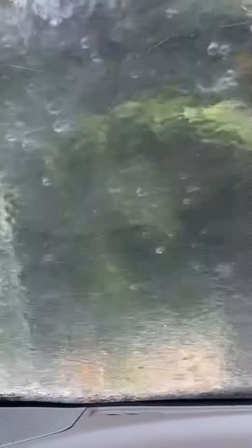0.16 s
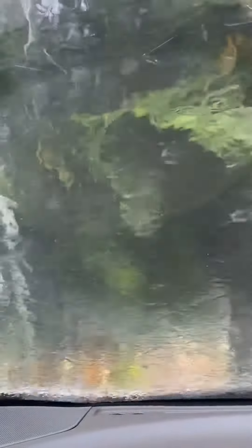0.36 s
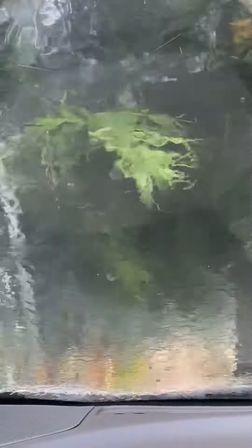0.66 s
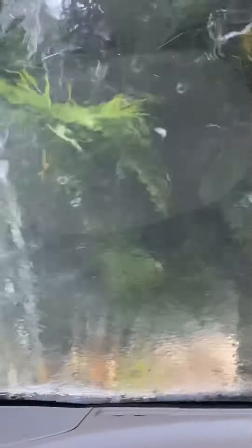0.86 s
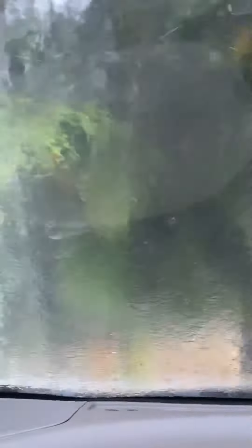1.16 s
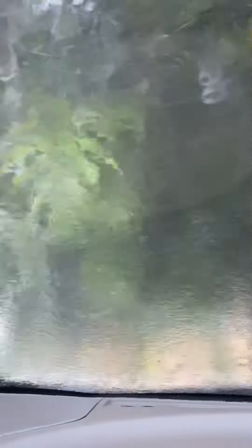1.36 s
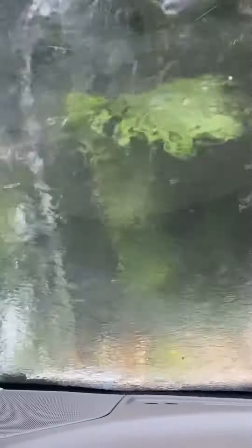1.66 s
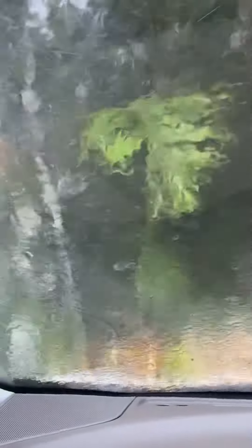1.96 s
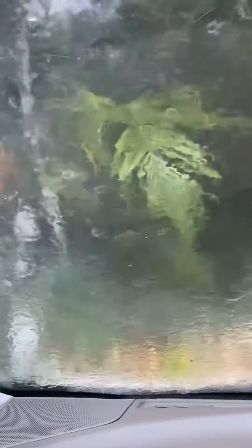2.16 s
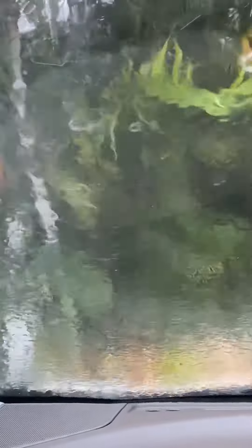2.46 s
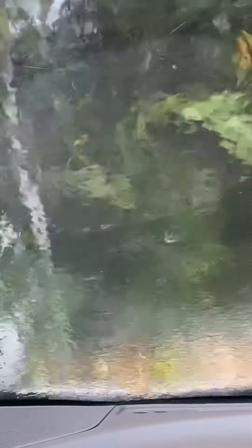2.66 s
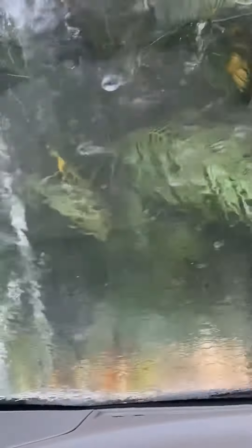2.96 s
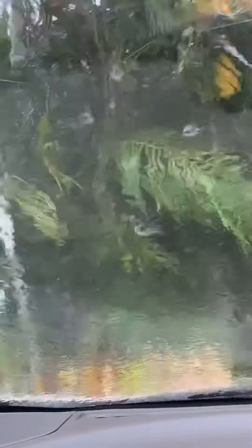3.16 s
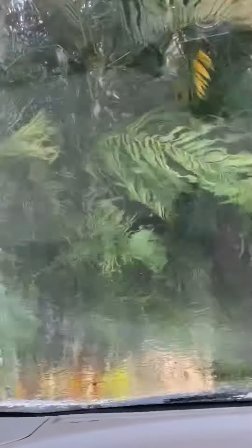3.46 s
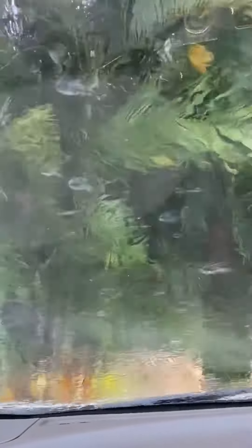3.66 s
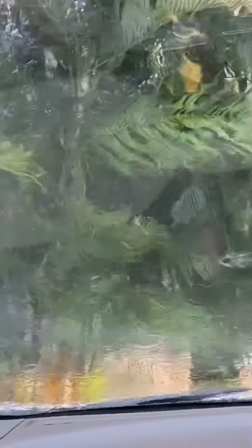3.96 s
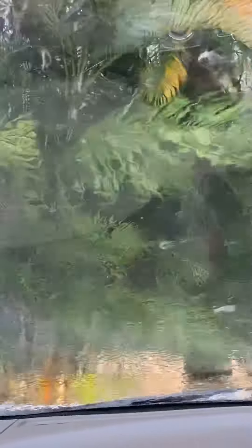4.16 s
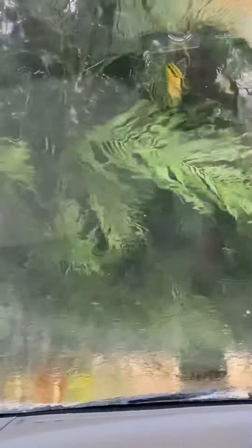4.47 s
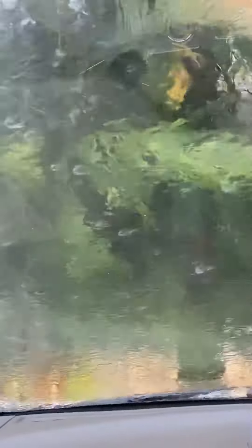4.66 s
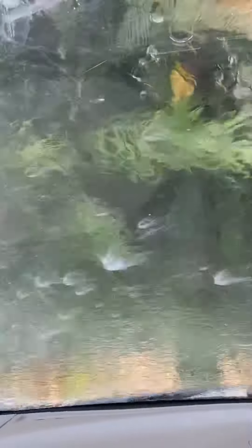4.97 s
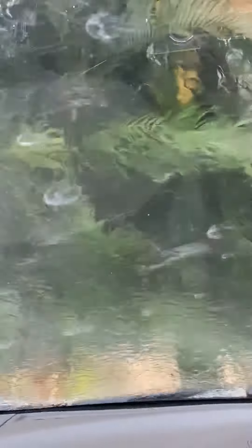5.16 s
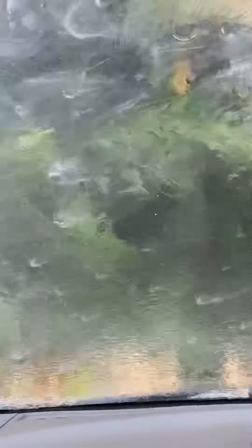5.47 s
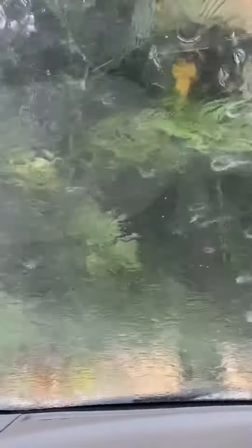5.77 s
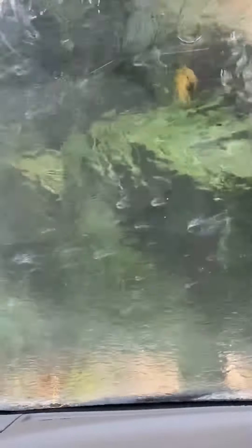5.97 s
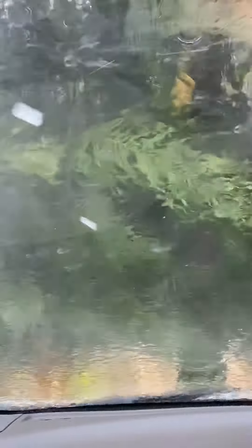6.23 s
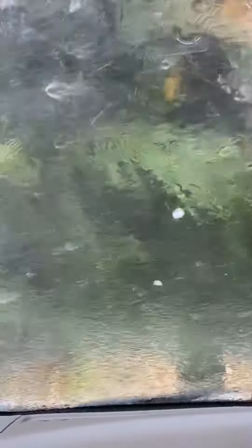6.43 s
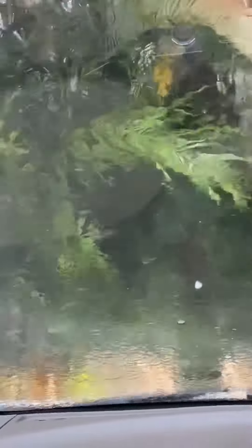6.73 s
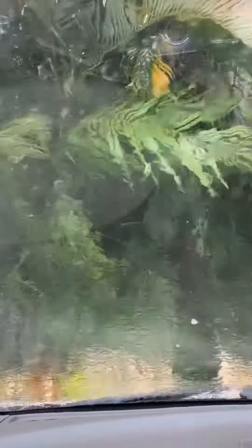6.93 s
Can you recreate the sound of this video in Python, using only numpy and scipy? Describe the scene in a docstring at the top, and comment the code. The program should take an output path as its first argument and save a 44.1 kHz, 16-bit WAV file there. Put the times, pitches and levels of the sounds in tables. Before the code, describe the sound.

Inside a parked car, heavy rain hisses while large hailstones crack sharply on the windshield. The blows come thickest in the first second, thin into separate clicks and knocks, then crowd together again after about five seconds. Dull thuds on the roof and brief hollow trim notes mix in. Close stereo microphone in the cabin, its level dipping briefly after the loudest hits.

```python
"""Hail and heavy rain beat on a parked car, heard inside the cabin through two microphone ports.
Rain noise, drops and a random patter of small stones start heavy, thin out, then swell again late on.
From the first instant large stones crack: each drives a dense, damped noise rattle and ringing resonances.
Soon some also thud on the roof, as low decaying sines with a shudder, or ring the trim on a clear note.
Stones come thickest at the start and again late on; loud blows briefly pull the whole level down."""
import sys
import numpy as np
from scipy import signal
from scipy.fft import rfft, irfft
from scipy.io import wavfile
from scipy.ndimage import uniform_filter1d

SR = 44100
rng = np.random.default_rng(int(sys.argv[2]) if len(sys.argv) > 2 else 0)


def generate_wav(sig):
    """Save sig (samples, or channels by samples) to the path in sys.argv[1] as 16-bit PCM at SR."""
    pcm = np.round(np.clip(np.atleast_2d(sig).T, -1, 1) * 32767).astype(np.int16)
    wavfile.write(sys.argv[1], SR, pcm)


N = 313110

# Bands of the struck panel: knock, crack, fizz. Each row: low edge in Hz, high edge in Hz,
# base t60 in seconds, base rise in ms (large stones scale both), band level in dB.
PANEL_BANDS = [(250, 1740, 0.1, 0.78, 3), (1650, 5700, 0.09, 0.98, -14.5), (4800, 20700, 0.074, 0.43, 0)]


def gain_of(db):
    """Amplitude factor for a level in dB."""
    return 10 ** (np.asarray(db) / 20)


def evened(x):
    """Scale to an RMS of 1."""
    return x / np.sqrt(np.mean(x ** 2) + 1e-20)


def read(points, hz):
    """Read a curve of (Hz, value) points, straight between them on a log frequency axis."""
    f, value = np.transpose(points)
    return np.interp(np.log(hz + 1), np.log(f + 1), value)


def add(mix, s, sound):
    """Mix a sound in, starting at s seconds."""
    part = mix[..., round(s * SR):][..., :sound.shape[-1]]
    part += sound[..., :part.shape[-1]]


def storm(column):
    """One column of the storm's level curve at every sample."""
    # Each row: time in seconds, rain in dB, patter of small stones in dB, cabin boom in dB.
    storm_rows = np.array([(0.0, -23.5, -30, -29.5), (0.829, -34, -38.5, -34), (2.2, -37, -40.5, -36),
                           (3.48, -38.5, -44.5, -36.5), (3.89, -43.5, -51, -37.5), (5.0, -35, -43, -35),
                           (6.41, -31.5, -41.5, -36), (6.6, -38.5, -58, -32), (7.1, -34.5, -41, -38)])
    return np.interp(np.arange(N) / SR, storm_rows[:, 0], storm_rows[:, column])


def hiss(colour, patchy_db, size):
    """Two unrelated noises of one colour, with shared patches of level drifting in time and pitch."""
    frames, hz = 4 * N // size + 5, np.fft.rfftfreq(size, 1 / SR)
    a, b, c, d, patches = rng.standard_normal((frames, len(hz), 5)).T
    patches = uniform_filter1d(patches, size=12, axis=0)  # across frequency
    patches = evened(uniform_filter1d(patches, size=10, axis=1))  # across time
    spectrum = np.array([a + 1j * b, c + 1j * d])
    spectrum = spectrum * gain_of(read(colour, hz)[:, None] + patchy_db * patches)
    noise = signal.istft(spectrum, nperseg=size, noverlap=3 * size // 4)[1]
    return evened(noise[:, :N])


def blow(t, rise_ms, t60):
    """Power that builds up over the rise and dies away; a negative t60 makes it swell instead."""
    build_up = (1 - np.exp(-1000 * t / max(rise_ms, .05))) ** 2
    return build_up * gain_of(-120 * t / t60)


def ring(x, hz, width_hz):
    """A two-pole resonance of gain about 1 at its centre."""
    r = np.exp(-np.pi * width_hz / SR)
    return signal.lfilter([1 - r, 0, r - 1], [1, -2 * r * np.cos(2 * np.pi * hz / SR), r * r], x)


def panel(powers):
    """Uneven reflections run about the panel: noise in each band follows that band's power curve."""
    # Colour of the panel. Each row: frequency in Hz, level in dB.
    panel_colour = [(300, 1), (1500, -4), (2500, 2.5), (3500, 3.5), (5000, -5.5), (7000, -6.5), (10000, -3),
                    (13000, -7.5), (15500, -12)]
    out = np.zeros((2, N))
    uneven = gain_of(3.1 * evened(uniform_filter1d(rng.standard_normal(N), size=16)))
    for power, (lo_hz, hi_hz, _, _, db) in zip(powers, PANEL_BANDS):
        band = signal.butter(3, [lo_hz, hi_hz], "band", fs=SR, output="sos")
        rattle = np.sqrt(power) * evened(uneven) * rng.standard_normal((2, N))
        make_up = np.sqrt(SR / 2 / (hi_hz - lo_hz))  # evens out the widths of the bands
        out += gain_of(db) * make_up * signal.sosfilt(band, rattle)
    return irfft(rfft(out) * gain_of(read(panel_colour, np.fft.rfftfreq(N, 1 / SR))), N)


def wash():
    """The blurred mass of rain: coloured noise that follows the rain level."""
    # Each row: frequency in Hz, level in dB per Hz (relative).
    wash_colour = [(250, 0), (500, -3), (780, 2), (1000, -15.5), (2000, -8), (3500, -9.5), (5000, -21),
                   (7000, -61), (10000, -24), (13000, -29), (15500, -49)]
    return gain_of(storm(column=1) - 7.5) * hiss(wash_colour, patchy_db=2.0, size=256)


def rumble():
    """The cabin booms: low noise with its own level curve."""
    # Each row: frequency in Hz, level in dB per Hz (relative).
    rumble_colour = [(60, -9.5), (125, 1.5), (250, -6), (400, -11.5), (800, -69)]
    return gain_of(storm(column=3)) * hiss(rumble_colour, patchy_db=2.2, size=1024)


def wind():
    """Wind as a steady bed of very low noise."""
    # Each row: frequency in Hz, level in dB per Hz (relative).
    wind_colour = [(28, -40), (33, 6), (40, 23), (60, 23.5), (90, 18), (140, -45)]
    return gain_of(-38.5) * hiss(wind_colour, patchy_db=1.0, size=4096)


def drops(per_s, db, rise_ms, t60, sharp, lo_hz, hi_hz):
    """Raindrops land at random; each plays a noise burst through the resonance of its spot."""
    size = gain_of(3.05 * np.minimum(rng.exponential(1, N), 3.5)) * (rng.random(N) < per_s / SR)
    spots_hz = np.geomspace(lo_hz, hi_hz, num=14)
    spot = rng.integers(0, len(spots_hz), N)
    t, out = np.arange(SR // 10) / SR, np.zeros((2, N))
    for k, hz in enumerate(spots_hz):
        noise = np.sqrt(blow(t, rise_ms, t60)) * rng.standard_normal((2, len(t)))
        burst = ring(noise, hz, hz / sharp)
        landed = signal.oaconvolve((size * (spot == k))[None], burst, axes=1)[:, :N]
        out += (hz / 1000) ** -.6 * landed  # low spots speak louder
    return gain_of(storm(column=1) + db) * evened(out)


def rain_drops():
    """Splats swell for a tenth of a second and stop dead; fine ticks and low roof taps die away."""
    # Each lists: drops per second, level in dB relative to the rain, rise in ms, t60 in seconds
    # (negative swells), sharpness of resonance (centre over width), lowest and highest spot in Hz.
    soft_splats = (621, -10, 8.5, -0.07, 8.5, 705, 6497)
    hard_ticks = (600, -9, .2, .018, 2.6, 700, 6500)
    roof_taps = (260, -4.5, 1.5, .08, 11, 280, 1000)
    return drops(*soft_splats) + drops(*hard_ticks) + drops(*roof_taps)


def patter():
    """Small stones land at random, each with its own size and brightness, and rattle the panel."""
    per_s, spread_db, bright_spread_db = 150, 2.8, 4.5
    lands = rng.random(N) < per_s / SR
    size_db = spread_db * np.minimum(rng.exponential(1, N), 3)
    bright_db, t = bright_spread_db * rng.standard_normal(N), np.arange(SR // 5) / SR
    powers = []
    # brightness trades knock for fizz; band levels in dB relative to the crack
    for tilt, db, (_, _, t60, rise_ms, _) in zip((-1, 0, 1), (-13, 0, -16), PANEL_BANDS):
        hits = lands * gain_of(2 * (size_db + tilt * bright_db + db))
        powers.append(abs(signal.oaconvolve(hits, blow(t, rise_ms, t60))[:N]))
    return gain_of(storm(column=2)) * evened(panel(powers))


def snap(t):
    """Hard ice on the glass close by: a cycle or two, gone in about a millisecond."""
    snap_hz, peak_ms = 5300, 0.21
    age = 1000 * t / peak_ms
    return np.sin(2 * np.pi * snap_hz * t) * age * np.exp(1 - age)


def glass(drive):
    """The modes of the glass ring unevenly from blow to blow, each shifted in level and pitch."""
    # Each row: mean frequency in Hz, width in Hz, mean level in dB relative to the struck spot's note.
    glass_modes = [(1150, 130, -24), (1950, 150, -20), (2530, 130, -17), (3100, 150, -19), (3750, 150, -18),
                   (4300, 150, -17), (5000, 170, -19)]
    spread_db, pitch_spread = 3.5, .05  # pitch as a fraction
    out = 0
    for hz, width_hz, mode_db in glass_modes:
        a, b = rng.standard_normal(2)
        mode = ring(drive, hz * (1 + pitch_spread * b), width_hz) * np.sqrt(SR / width_hz)
        out = out + gain_of(mode_db + spread_db * a) * mode
    return out


def stones():
    """Large stones: a tick of contact, panel rattle, spot note, glass modes, dry snap, then chips."""
    # Each row: start in seconds, crack level in dB, brightness in dB, note of the struck spot in Hz,
    # ring length as a factor on t60 (at least 0.2), dry snap from 0 to 1.
    stone_rows = [(.0034, -11, -4, 4100, 0.93, 0.4), (0.1034, -5, 3, 1940, 0.94, 0.5),
                  (0.138, -11.5, 4, 2930, 1.4, 0), (0.1663, -6.5, 7.5, 2970, 1.1, 0.1),
                  (0.217, -18, 8, 2530, 1.6, 0), (0.252, -16.5, 10, 2440, .8, .3),
                  (.268, -15, 2.5, 3470, 1.9, 0.2), (0.3198, -11.5, -3.5, 2740, 2.1, 0.2),
                  (0.345, -16.5, 12.5, 1150, 0.54, 0), (0.403, -10.5, -2, 1800, 0.58, 0.28),
                  (.425, 1.5, 1.5, 4800, 0.85, 0), (0.5014, -8.5, -3, 1920, 1.15, 0.1),
                  (0.592, -15, 1, 2500, 1.3, 0), (0.612, -25.5, 1, 3700, 14, 0.8),
                  (0.722, -9.5, 0.5, 3020, 0.76, 0.75), (0.7937, -3, 7, 2600, 0.91, 0.45),
                  (0.897, -21, -6, 5070, 1.3, 0.2), (1.0008, -20.5, 10, 3660, 0.65, 0.2),
                  (1.051, -15, 4, 1480, 0.67, 0), (1.076, -12.5, 2, 4900, 0.51, 0.1),
                  (1.1609, -18.5, -1, 3550, 1.9, 0.5), (1.172, -18.5, -11.5, 1900, 2.2, 0.6),
                  (1.27, -25.5, 4, 3500, 1.9, .1), (1.304, -23, 3, 2650, 1.2, 0),
                  (1.3647, -13, -1, 2240, 1.75, 0.1), (1.478, -24, 3.5, 4280, 5.4, 0.6),
                  (1.593, -19.5, 9, 5300, 0.28, 0.1), (1.6495, -25.5, -6, 1180, 3.9, 0.1),
                  (1.686, -15, 0.5, 1520, 3, 0), (2.051, -20.5, -8.5, 2510, 1.4, 0),
                  (2.1369, -15.5, -3, 860, 1.04, 0.3), (2.161, -19, -1, 2420, 0.84, 0.45),
                  (2.185, -23, -8.5, 1880, 1.75, 0.1), (2.261, -19.5, -11.5, 2470, 1.35, 0),
                  (2.3564, -9, -1, 3000, 0.51, 0.36), (2.478, -26, 6, 3030, .8, 0.2),
                  (2.4891, -22.5, -9, 2220, 1, 0.6), (2.512, -10, -2.5, 3380, 1, 0.15),
                  (2.5692, -20, -8.5, 1020, 0.8, 0.1), (2.689, -14.5, 9, 2100, 0.57, 0.1),
                  (2.8048, -7, 4, 4000, 0.75, 0.24), (2.924, -16, 1.5, 1090, 0.82, 0),
                  (3.05, -12, -1, 2330, 0.64, 0.08), (3.098, -21, 9, 3030, 0.62, 0.1),
                  (3.11, -14.5, 2, 4150, 1.75, 0.2), (3.181, -2.5, 0.5, 4430, 0.63, 0.1),
                  (3.24, -24, -2, 2620, 1.3, 0.1), (3.286, -7, -0.5, 3820, 0.69, 0.27),
                  (3.373, -14.5, -2, 1530, 1.47, 0.15), (3.4535, -14.5, 3, 2440, 0.84, 0),
                  (3.482, -22, 6, 5500, 0.33, 0.1), (3.5018, -26.5, -13, 950, 1.34, 0),
                  (3.61, -23, 5, 2900, 0.48, 0.4), (3.6758, -24.5, 9.5, 4060, 0.95, 0.6),
                  (3.783, -23, -6.5, 2550, 1.4, 0.1), (3.8422, -15.5, -4, 1060, 2.06, 0),
                  (3.893, -8, 6, 5100, 1.28, 0.14), (4.116, -12.5, 8.5, 5560, 0.57, 0.6),
                  (4.2101, -23, -7, 864, 1.6, 0.2), (4.2395, -24, -11, 1670, 1.04, 0.05),
                  (4.2933, -18.5, 3, 4160, 2.1, 0.1), (4.328, -19, -8, 5270, 1.46, 0.6),
                  (4.4784, -25.5, 4, 3800, 1.3, 0.4), (4.657, -15.5, 3, 2480, 0.6, 0),
                  (4.8996, -18, -0.5, 2600, 1.2, 0.16), (5.203, -16.5, -3.5, 2630, 1.8, .1),
                  (5.226, -18, -5.5, 4020, 1.26, 0), (5.301, -17.5, 3, 4500, 0.79, 0.1),
                  (5.317, -19, -8.5, 2530, 1.35, 0.2), (5.363, -22, 11, 2690, 0.46, 0.3),
                  (5.3831, -4.5, 4.5, 5300, 0.85, 0.05), (5.534, -26, -10.5, 3060, 2.3, .1),
                  (5.597, -1.5, 0.5, 5400, 0.57, 0.3), (5.623, -14.5, -1, 5030, 0.84, .1),
                  (5.673, -21.5, 13.5, 1060, 0.28, 0.1), (5.764, -13, 8, 4570, 0.67, 0.5),
                  (5.824, -19, 13, 4900, 0.93, .53), (5.847, -0.5, 2, 5570, 0.49, 0.06),
                  (5.8892, -21, 5, 1800, .82, 0), (5.9524, -30, 17, 5320, 0.45, 0.1),
                  (6.046, -8.5, -0.5, 1240, 0.31, 0), (6.057, -5, 1.5, 2520, 0.96, 0.4),
                  (6.154, -20, -0.5, 5170, 1.2, 0.2), (6.19, -21, 5, 1800, 2.5, 0.2),
                  (6.299, -15, 11, 2590, 0.92, 0), (6.36, -17.5, -13, 2040, 1.5, 0),
                  (6.436, -15.5, 13.5, 5100, .8, 0.1), (6.448, -15.5, 7, 5600, 1.1, .1),
                  (6.4701, -6.5, 1.5, 4400, 1.18, 0.3), (6.5257, -4.5, -2.5, 2470, 1.2, 0.05),
                  (6.677, -24.5, -7.5, 1790, 1.6, 0.7), (6.7457, -19.5, -4.5, 4800, 1.45, 0.1),
                  (6.9149, -15.5, -4.5, 1700, 2.07, 0), (7.0865, -13.5, 3, 3940, 1.7, 0.2)]
    knock_db, fizz_db, note_db, snap_db = -15, -9.5, -9, 5  # re crack, at brightness 0
    chip_wait_s, chip_db = .016, -5  # chips of ice land again within this wait, at most this loud
    rise_factor, rise_per_ring, rise_per_snap = 1.66, 0.95, 0.18
    powers, notes, t = np.zeros((3, N)), np.zeros((2, N)), np.arange(SR // 5) / SR
    tick = 1 + 1.4 * np.exp(-t / 0.00013)  # extra power at the moment of contact
    click = snap(t)
    for s, db, bright_db, hz, length, dry_snap in stone_rows:
        length, dry_snap = max(length, .2), np.clip(dry_snap, 0, 1)
        # a long ring also starts softly, a dry snap sharpens the start
        soft = rise_factor * length ** rise_per_ring * (1 - rise_per_snap * dry_snap)
        shapes = [blow(t, rise_ms * soft, t60 * length) for _, _, t60, rise_ms, _ in PANEL_BANDS]
        # a bright stone trades knock for fizz
        band_dbs = (knock_db - bright_db, 0, fizz_db + bright_db)
        for power, rel_db, shape in zip(powers, band_dbs, shapes):
            share, wait = rng.random(2)
            add(power, s, gain_of(2 * (db + rel_db)) * shape * tick)
            chips = gain_of(2 * (db + rel_db + chip_db)) * share * shape ** 2 * tick
            add(power, s + chip_wait_s * wait, chips)
        grain = evened(uniform_filter1d(rng.standard_normal(len(t)), size=40))
        drive = np.sqrt(shapes[1]) * grain * rng.standard_normal((2, len(t)))
        spot = ring(drive, hz, hz / 6) * np.sqrt(SR / hz / 2)
        note = gain_of(db + note_db) * (spot + glass(drive))
        add(notes, s, note + dry_snap * gain_of(db + snap_db) * click)
    return panel(powers) + notes


def thuds():
    """The roof swings at a low pitch with a rough, spread-out shudder around it."""
    # Each row: start in seconds, level in dB, pitch in Hz, t60 in seconds.
    thud_rows = [(0.325, -14, 176, 0.11), (0.337, -15.5, 88.5, 0.21), (.362, -17.5, 150, 0.07),
                 (.416, -20, 80, 0.18), (0.429, -16, 227, .1), (0.794, -20, 131, 0.16),
                 (1.18, -21.5, 144, 0.25), (1.203, -19.5, 168, 0.22), (1.374, -18.5, 214, 0.11),
                 (2.93, -22.5, 146, 0.14), (3.183, -22, 510, 0.06), (3.373, -27.5, 171, 0.17),
                 (3.852, -20, 180, 0.16), (3.876, -16.5, 129, 0.33), (4.332, -22, 103, 0.21),
                 (4.925, -20.5, 100.5, 0.29), (5.849, -20, 202, 0.079), (6.367, -13, 255, 0.11),
                 (6.376, -18, 157, 0.28)]
    out, t = np.zeros(N), np.arange(SR // 3) / SR
    low = signal.butter(2, [80, 500], "band", fs=SR, output="sos")
    for s, db, hz, t60 in thud_rows:
        shudder = evened(signal.sosfilt(low, rng.standard_normal(len(t))))
        swing = np.sin(2 * np.pi * hz * t) + 0.3 * shudder
        add(out, s, gain_of(db) * np.sqrt(blow(t, rise_ms=1.3, t60=max(t60, .03))) * swing)
    return out


def trim():
    """A hollow trim panel or pane rings on a slightly unsteady note of its own."""
    # Each row: start in seconds, level in dB, pitch in Hz, t60 in seconds.
    ring_rows = [(0.503, -12, 780, 0.057), (1.368, -25.5, 702, 0.09), (2.263, -20, 2570, 0.048),
                 (2.518, -22, 780, 0.23), (3.052, -23.5, 2150, 0.045), (3.37, -23, 723, 0.11),
                 (4.116, -33.5, 1060, 0.076), (4.334, -25, 750, 0.094), (5.325, -29.5, 780, 0.17),
                 (6.528, -15.5, 2080, 0.042), (6.916, -28, 1665, .12), (6.988, -29.5, 770, 0.12)]
    out, t = np.zeros(N), np.arange(SR // 4) / SR
    for s, db, hz, t60 in ring_rows:
        unsteady = evened(ring(rng.standard_normal(len(t)), hz, width_hz=hz / 20))
        note = np.sin(2 * np.pi * hz * t) + .22 * unsteady
        add(out, s, gain_of(db) * np.sqrt(blow(t, rise_ms=0.55, t60=max(t60, .03))) * note)
    return out


def ports(pair):
    """Left port as it is; the right port hears a late, partly different copy."""
    # Likeness of the two ports. Each row: frequency in Hz, likeness from 0 to 1.
    likeness = [(100, .9997), (300, .975), (1000, .42), (2000, .8), (2900, .35), (5000, .7), (6800, .98),
                (7700, .99), (8700, .85), (10500, .99), (12100, .78), (13000, .99), (14200, .97),
                (15000, .62)]
    # Balance of the two ports. Each row: frequency in Hz, left minus right in dB.
    balance = [(300, 0), (600, 2), (1100, 1.5), (2000, -.3), (15000, 0)]
    # the left leads slightly below shadow_hz; the part of the band above it leads by more
    shadow_hz, low_lead_s, high_lead_s = 4800, 1.6e-5, 1.64e-4
    hz = np.fft.rfftfreq(N, 1 / SR)
    low_turns = low_lead_s * np.minimum(hz, shadow_hz)
    high_turns = high_lead_s * np.maximum(hz - shadow_hz, 0)
    lead = 2 * np.pi * (low_turns + high_turns)  # phase in radians
    like, spectra = np.clip(read(likeness, hz), 0, 1), rfft(pair)
    right = like * spectra[0] + np.sqrt(1 - like ** 2) * spectra[1]
    right = right * np.exp(-1j * lead) * gain_of(-read(balance, hz))
    return np.array([pair[0], irfft(right, N)])


def scene():
    """Rain, wind and hail together, as they reach the two ports."""
    rain = wash() + rumble() + wind() + rain_drops()
    hail = patter() + stones() + thuds() + trim()
    return ports(rain + hail)


def record(dry):
    """Gain control ducks everything after loud blows; peaks round off; a low-pass limits the band."""
    threshold_db, excess_share = -24, 0.43  # share of the excess in dB taken off
    smooth_s, held_fall_db_per_s = 0.025, 43
    lag = np.exp(-1 / (smooth_s * SR))
    power = signal.lfilter([1 - lag], [1, -lag], (dry ** 2).mean(0))
    power_db = 10 * np.log10(power + 1e-12)
    fall = np.arange(N) * held_fall_db_per_s / SR
    held_db = np.maximum.accumulate(power_db + fall) - fall  # jumps to peaks, then falls steadily
    over_db = np.maximum(held_db - threshold_db, 0)
    ducked = dry / gain_of(excess_share * signal.lfilter([1 - lag], [1, -lag], over_db))
    rounded = 2 * np.tanh(ducked / 2)
    low_pass = signal.firwin(511, 15900, window=("kaiser", 9), fs=SR)  # edge in Hz
    return signal.oaconvolve(rounded, low_pass[None], "same")


dry = scene()
out = record(dry)
generate_wav(out)
```